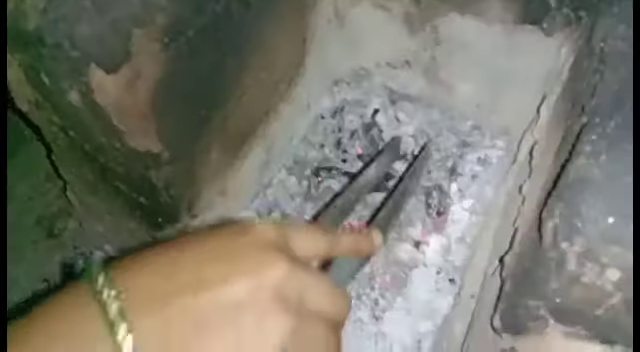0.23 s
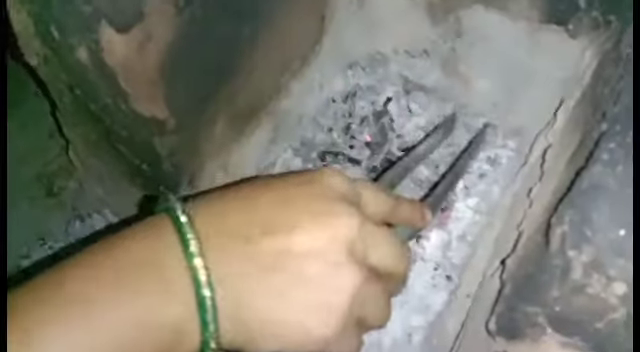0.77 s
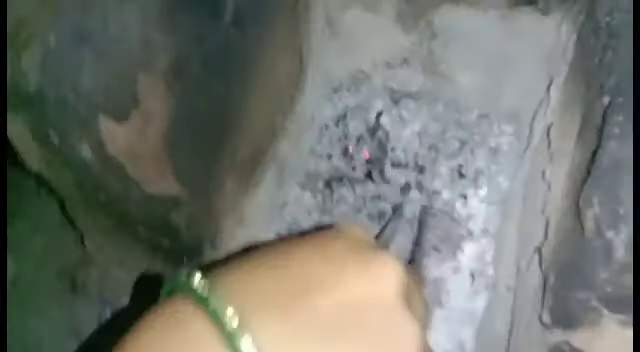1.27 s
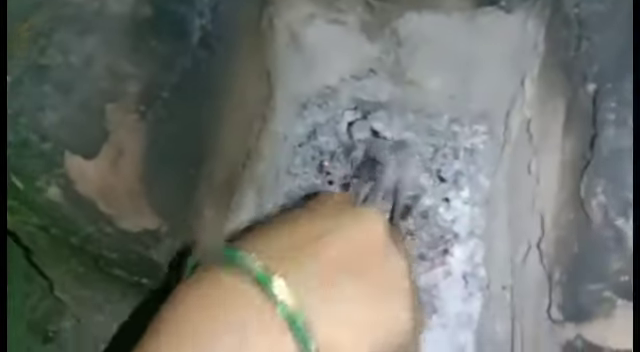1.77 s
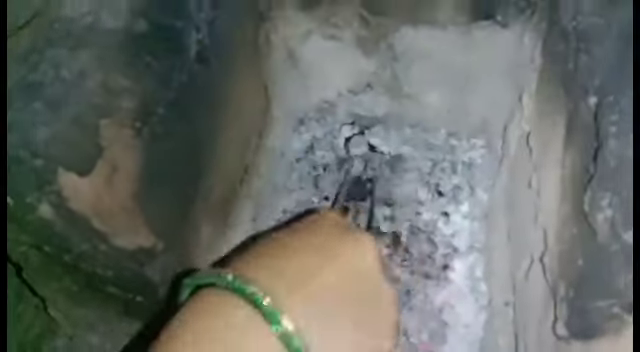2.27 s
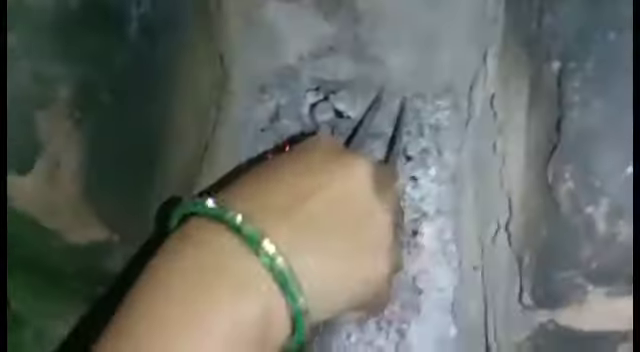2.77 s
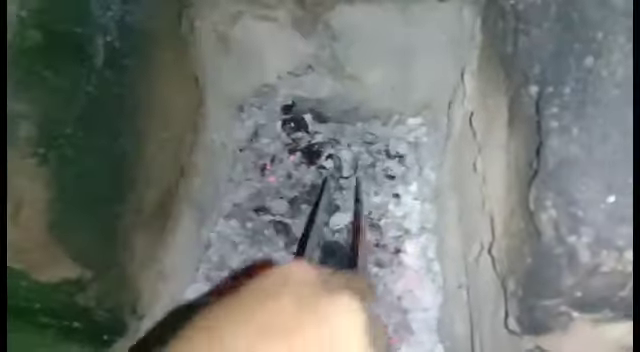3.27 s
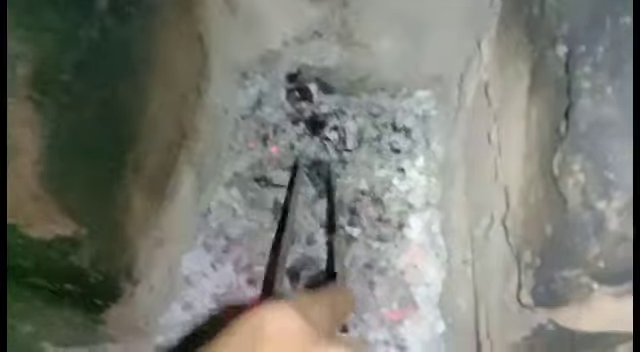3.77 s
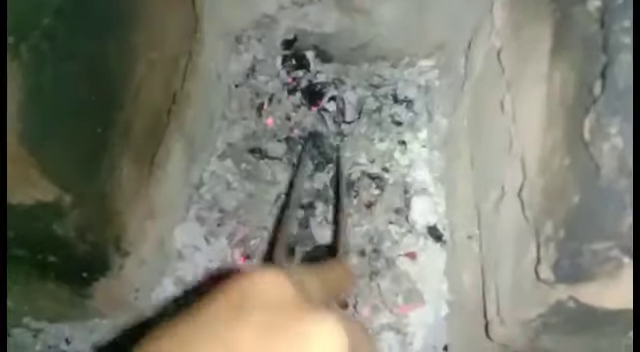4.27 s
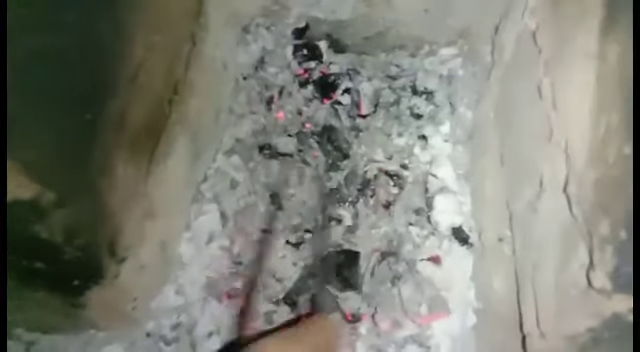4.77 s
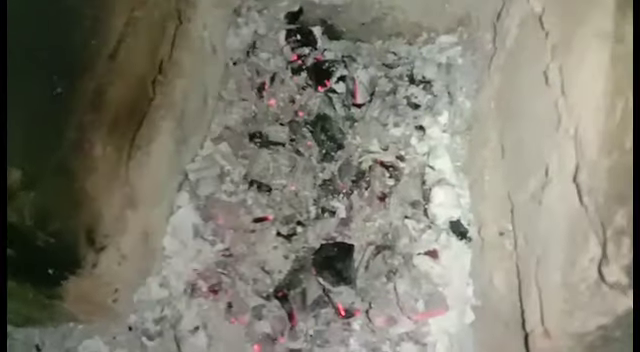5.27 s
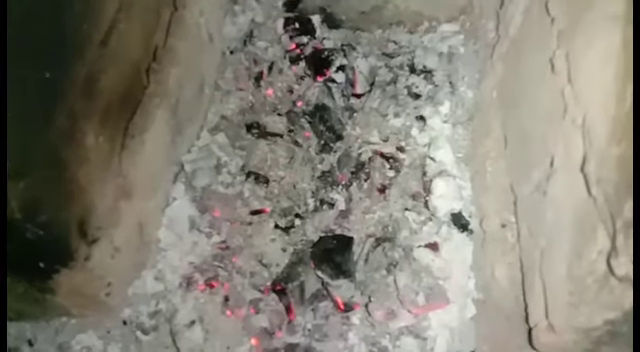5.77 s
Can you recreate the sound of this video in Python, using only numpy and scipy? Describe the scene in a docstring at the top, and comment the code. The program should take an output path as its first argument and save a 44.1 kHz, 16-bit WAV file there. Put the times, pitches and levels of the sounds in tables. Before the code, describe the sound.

Steel tongs work through ash and coals in a clay stove, close up, over a faint low outdoor rumble and thin hiss. Two light ticks come in the first half second. At about 1 second a gritty scrape begins, with brittle coal crunches and small, high clinks that die quickly in the ash. A denser cluster follows from 1.6 to 2 seconds and another around 2.4. The sharpest crunching and scraping falls between 2.8 and 3.8 seconds, with further short strokes near 4.1 and from 4.4 to 4.7. Scattered lighter clicks follow. From about 5.1 to 5.8 seconds a very faint two-tone horn sounds far away. Between 5.5 and 5.8 seconds the tongs are laid down with several dull knocks on the clay, one clearly stronger, and a slight metallic ring. The close walls add only a very short tail.

```python
"""Steel tongs rake ash and embers in a clay stove outdoors. Each stroke is a rush of dense grit; each knock
on a coal is a brittle crunch that rings the steel, choked while the tips are buried. Dull blows ring
the clay and boom in the stove floor, most of them at the end as the tongs are laid down.
The close walls add a short tail. Underneath lie a low rumble, thin hiss and a faint steady tone,
and a far two-tone horn sounds near the end."""
import sys
import numpy as np
from scipy import signal
from scipy.fft import rfft, irfft, next_fast_len
from scipy.io import wavfile
from scipy.ndimage import uniform_filter1d

SR = 44100
rng = np.random.default_rng(int(sys.argv[2]) if len(sys.argv) > 2 else 0)


def store_pcm(level_fs):
    """Save levels as 16-bit WAV."""
    pcm = np.round(np.clip(level_fs, -1, 1) * 32767).astype(np.int16)
    wavfile.write(sys.argv[1], SR, np.atleast_2d(pcm).T)


N = 265923

# modes of the steel tongs: (pitch [Hz], level [dB], undamped t60 [s])
TONG_MODES = [(860, -16, .12), (1270, -8, .35), (1780, -11, .25), (2015, -12, .2), (2465, -15, .5),
              (2870, -19, .3), (3280, -14, .35), (3570, -16, .2), (3725, -16, .35), (4040, -18, .3),
              (4330, -18, .2), (4760, -5, .2), (5000, -10, .25), (5420, -6, .15), (5750, -8, .2),
              (6455, -5, .6), (6580, -1, .15), (6920, -7, .08), (7240, -6, .08), (7520, -12, .06),
              (8710, -24, .06), (9300, -23, .06), (9690, -23, .06), (10200, -19, .06), (10760, -19, .06),
              (11180, -16, .08), (11650, -19, .08), (12600, -23, .05)]
# brittle coal cracking against steel: (frequency [Hz], level [dB])
CRACK_EQ = [(150, -61.5), (250, -6.5), (841, -16.5), (1030, -48), (1270, -6), (2930, -22.5), (3300, -7),
            (4280, -20), (4670, -5.5), (6160, -5.5), (6600, -2.5), (8130, -13), (11300, -7.5), (13400, -16),
            (15700, -50)]
# knocks on coals: (time [s], level [dB], lows [dB], highs [dB], crunch pitch [Hz], ring pitch [Hz],
# ring [dB], blade ring [dB], leg ring [dB]); lows, highs and rings are relative to the level
KNOCK_HITS = [(0.1074, -53, -14, -14, 5990, 5750, -36, -38, -36),
              (0.1368, -44.5, -22, -20, 6150, 5860, -34, -33, -46),
              (0.1591, -25, -35, -35, 6630, 7240, -52, -30, -36),
              (0.3269, -31.5, -17, -43, 3080, 2870, -15, -52, -47),
              (1.0283, -33, -36, -46, 5250, 5250, -34, -40, -35),
              (1.042, -34, -11, -28.5, 5540, 3570, -38, -52, -44),
              (1.0942, -27.5, -10.5, -23.5, 5800, 7300, -11, -41, -23),
              (1.1447, -40, -25, -20, 6880, 6880, -34, -42, -42),
              (1.17, -30, -17, -18, 6900, 6740, -34, -42, -42),
              (1.188, -10, -30.5, -24.5, 6300, 4760, -43, -52, -27),
              (1.2544, -25, -11, -24, 6900, 3280, -52, -51.5, -41),
              (1.34, -36.5, -13, -12, 5700, 5550, -36, -44, -40),
              (1.3632, -35, -23, -23, 5830, 3263, -52, -48.5, -47),
              (1.3935, -35, -37, -19, 6300, 7300, -50, -52, -47.5),
              (1.575, -27, -35, -22.5, 5400, 7160, -47, -36.5, -32),
              (1.6842, -16.5, -16.5, -21, 6610, 6610, -37, -41, -45),
              (1.6933, -12.5, -21.5, -24, 4840, 4700, -25, -31, -42),
              (1.7122, -8.5, -44, -24, 6360, 6490, -44, -38, -35),
              (1.724, -14.5, -30, -34, 6540, 6610, -34, -38, -37),
              (1.739, -21, -18.5, -21, 6430, 2465, -37, -52, -30),
              (1.8071, -20.5, -27, -19.5, 6070, 5420, -21, -36, -18.5),
              (1.8538, -17, -34, -26, 6450, 6740, -34, -36, -40),
              (1.8804, -25, -14, -19, 6430, 6430, -34, -36, -42),
              (1.8962, -21, -34, -36, 6000, 5910, -34, -38, -42),
              (1.909, -14, -39, -28.5, 6260, 5750, -52, -53, -46),
              (1.9597, -23, -33, -25.5, 5000, 3760, -35, -53, -44),
              (2.0468, -26, -34, -25.5, 6560, 2015, -23, -26, -29),
              (2.0863, -46, -17, -25, 6520, 1790, -50.5, -51, -42),
              (2.3174, -33.5, -3.5, -8, 5400, 5440, -36, -40.5, -37),
              (2.3332, -24.5, -15, -26, 6850, 6890, -34, -42, -42),
              (2.3544, -20, -20.5, -21.5, 4720, 4720, -34, -38, -42),
              (2.3736, -17.5, -36, -29, 4720, 3280, -40, -23, -31),
              (2.4158, -25, -17, -32, 7140, 7140, -34, -37, -42),
              (2.4396, -36.5, -8, -12, 5300, 2465, -26, -51, -14),
              (2.473, -19, -23, -23.5, 6740, 5420, -30, -34, -19),
              (2.6455, -20, -37, -19, 6950, 5420, -43, -31.5, -48.5),
              (2.718, -50.5, -2, -27, 6640, 6600, -31, -28, -38),
              (2.7447, -20, -21.5, -23, 7100, 5420, -45, -34, -46),
              (2.8497, -31, -6, -9, 3660, 3590, -36, -28, -35),
              (2.8583, -2.5, -30, -20.5, 5540, 5380, -41, -28, -48),
              (2.8682, -17, -27, -28, 6740, 6780, -30, -30, -32),
              (2.8782, -10, -41, -21, 6740, 7240, -50, -30, -49),
              (2.9758, -13, -32, -28.5, 5350, 4760, -28, -52, -44),
              (3.0241, -25.5, -11, -22, 3640, 3600, -34, -53, -42),
              (3.0413, -19, -14, -19, 6800, 6640, -36, -43, -42),
              (3.0526, -7.5, -22, -22, 6700, 6760, -34, -38, -24),
              (3.0597, -12, -20, -45, 6500, 6440, -29, -38, -45),
              (3.0845, -16, -24, -13, 6500, 6590, -34, -36, -37),
              (3.0914, -4, -37.5, -24, 6640, 6900, -38, -40, -45),
              (3.0994, -17.5, -39, -33.5, 6800, 4760, -51, -9.5, -47),
              (3.159, -17, -21, -22.5, 7200, 3220, -55, -54, -44),
              (3.2024, -40, -24, -17, 6590, 2015, -31, -7.5, -44),
              (3.2433, -14.5, -35, -35, 6560, 4760, -46, -43, -33.5),
              (3.2938, -15, -27.5, -25, 6820, 2550, -31.5, -40, -33),
              (3.394, -50.5, -13, -15, 6420, 6380, -27, -36, -41),
              (3.402, -48, -20, -6.5, 3820, 5750, -42, -52, -43),
              (3.4347, -56, -7, -25.5, 3660, 2465, -19, -56.5, -45),
              (3.4888, -59.5, -35, -3, 5780, 7240, -22.5, -50.5, -19),
              (3.5429, -18, -22, -31, 5300, 5160, -36, -37, -39),
              (3.5607, -16, -28.5, -23.5, 7400, 7070, -36, -39.5, -44),
              (3.5777, -11.5, -32, -32, 6600, 5420, -52, -52, -31),
              (3.6211, -20.5, -20.5, -23, 6050, 3725, -21.5, -30, -44),
              (3.6626, -8.5, -34, -26, 7000, 5750, -41, -35, -34),
              (3.7004, -13, -24.5, -22, 6640, 1780, -32, -30, -34),
              (3.7448, -27, -21, -35, 4550, 4700, -52, -33, -44),
              (3.7827, -29, -25, -27, 3400, 3590, -31, -44, -28.5),
              (3.8115, -34, -24, -24, 6800, 6980, -31, -30.5, -22),
              (3.8251, -16.5, -33.5, -26.5, 6960, 4730, -50, -35, -46),
              (3.8684, -58, -24, -30, 6660, 1740, -17, -31, -16.5),
              (3.9269, -54, -14.5, -22, 6800, 4730, -53, -31.5, -33),
              (3.9997, -24.5, -23, -40, 4480, 2465, -37, -48, -30),
              (4.059, -37.5, -24, -19.5, 5700, 7240, -11, -46, -14),
              (4.0924, -22.5, -10.5, -28, 6550, 6460, -36, -38, -36),
              (4.1012, -15.5, -25, -37, 6860, 4100, -46, -51, -17.5),
              (4.165, -16.5, -30, -32, 6230, 4670, -53, -53, -44.5),
              (4.4249, -36, -7, -18, 5430, 5430, -30, -38, -42),
              (4.4434, -11, -27, -25, 6560, 7240, -41, -18, -46),
              (4.4881, -13, -25.5, -30.5, 7070, 3725, -29, -54, -39),
              (4.519, -37, -25, -24, 5400, 5400, -34, -42.5, -42),
              (4.5368, -13, -30, -27.5, 5670, 2015, -26, -51, -25),
              (4.5789, -11.5, -31.5, -28, 5630, 3280, -56, -53, -24),
              (4.6244, -30.5, -13, -17.5, 5530, 5400, -34, -39, -42),
              (4.6498, -19, -29, -30, 6460, 4760, -52, -50, -32),
              (4.7145, -30, -28.5, -30.5, 6960, 4530, -59, -52, -41),
              (4.8842, -30.5, -27, -35.5, 3730, 3280, -24.5, -52, -22),
              (4.9195, -30, -13.5, -34, 7200, 5420, -53, -53.5, -45),
              (5.0492, -37, -31, -37.5, 5080, 5120, -14, -38, -33),
              (5.0905, -24.5, -34, -33, 4770, 5000, -23, -52, -17),
              (5.1333, -34, -22.5, -30.5, 5120, 5000, -55, -40.5, -44),
              (5.318, -16.5, -38, -18, 5970, 2465, -30, -40, -42),
              (5.3627, -37, -21, -26, 5750, 4760, -20, -54, -28),
              (5.4148, -33.5, -41.5, -30.5, 4900, 7240, -45, -52, -31),
              (5.4862, -40, -10.5, -27, 5610, 4760, -26, -55, -27),
              (5.5342, -44, -8, -38, 3900, 3900, -36, -40, -42),
              (5.551, -29.5, -25, -51, 4820, 4760, -13.5, -51, -44),
              (5.587, -39.5, -21, -25, 5600, 3725, -15, -38.5, -44),
              (5.6219, -48, -2, -21, 3260, 4760, -36.5, -42, -36),
              (5.6543, -15.5, -19, -26, 5700, 4760, -41, -38, -44),
              (5.6857, -29.5, -18, -20.5, 7350, 7240, -52, -52.5, -44),
              (5.756, -34.5, -19, -38, 4670, 3650, -19, -52.5, -5.5),
              (5.8155, -39, -20, -42, 3670, 2340, -5, -50.5, -44)]
# strokes through ash: (start [s], dig [s], drag [s], lift [s], level once dug in [dB],
# level before lifting [dB], lows against mids [dB], highs against mids [dB])
ASH_STROKES = [(.09, 0.068, 0.044, 0.053, -61.5, -64, -6.5, -23),
               (0.323, 0.014, 0.031, 0.059, -64, -63, 0, -17),
               (1.04, 0.16, 0.18, 0.071, -37.5, -65, -1.5, -12.5),
               (1.674, .025, 0.11, 0.037, -41, -43.5, -4.5, -9),
               (1.779, 0.027, .16, .08, -38, -46.5, 4, -10),
               (2.044, 0.013, 0.051, 0.087, -57.5, -67.5, 6.5, -26),
               (2.189, 0.029, 0.055, 0.029, -70, -75.5, 4.5, -14.5),
               (2.71, .01, .04, 0.034, -60.5, -55.5, 7.5, -22),
               (5.315, 0.004, 0.076, .04, -46.5, -58, -5.5, -24),
               (2.308, 0.039, .19, 0.063, -39.5, -48, 2, -8),
               (2.85, 0.024, 0.16, 0.031, -34, -46.5, -1.5, -14),
               (3.019, 0.035, 0.1, .11, -52, -37, 1, -15),
               (3.535, .04, 0.084, 0.017, -38.5, -44.5, -3.5, -14),
               (3.63, 0.064, 0.028, .14, -40, -37.5, -5, -18.5),
               (3.841, .02, 0.085, 0.06, -71, -70, -4, -19), (4.05, 0.06, 0.0153, .09, -47, -45.5, 6, -15),
               (4.17, .01, 0.083, 0.024, -64.5, -68, -3.5, -14.5),
               (4.42, 0.054, 0.16, 0.071, -45.5, -41.5, -1, -14),
               (4.828, 0.037, 0.019, 0.034, -70.5, -52, -2.5, -26),
               (4.889, 0.031, 0.014, .03, -48.5, -51.5, 5, -17.5),
               (5.535, 0.022, 0.074, 0.024, -61.5, -74, 11.5, -14),
               (5.635, 0.02, 0.086, 0.039, -37, -65, 11.5, -16),
               (5.8, 0.035, 0.061, .1, -58.5, -83, 10.5, -26)]
# dull blows on the clay: (time [s], level [dB], favoured pitch [Hz], t60 factor, floor boom trim [dB])
CLAY_HITS = [(0.328, -23.5, 500, 0.73, -42), (1.043, -24, 740, 0.44, -28), (1.092, -31, 900, 1.3, -21),
             (1.684, -22, 1370, 1.9, -40), (4.425, -27, 1304, 1.4, -23), (5.534, -26, 1280, 1.3, -4),
             (5.619, -30, 1202, 1.3, -6), (5.647, -0.5, 1280, 0.57, -2.5), (5.663, -42, 1090, 0.87, -11),
             (5.701, -17, 1140, 0.74, 6), (5.754, -25, 1170, 1.85, 0), (5.816, -26, 1270, 1.52, -3)]
# modes of the clay wall: (pitch [Hz], level [dB], base t60 [s])
WALL_MODES = [(365, -13, 0.33), (493, 1.5, 0.039), (801, 2.5, 0.046), (1140, -7, 0.33), (1269, 9, 0.027),
              (1810, -1, 0.039)]
# modes of the stove floor: (pitch [Hz], level [dB], t60 [s])
FLOOR_MODES = [(150, -9, .1), (195, -4, .09), (238, 0, .08), (300, -11, .06)]
# colour of the outdoor air: (frequency [Hz], level [dB])
AIR_EQ = [(12, -45.5), (20, -34.5), (61, 1.5), (113, 2), (260, -13.5), (494, -20.5), (601, -21.5),
          (710, -27.5), (1050, -33), (1240, -23.5), (1830, -41), (2050, -31), (3680, -44), (5000, -42.5),
          (15700, -56.5)]
# fader moves on the outdoor air: (time [s], rumble [dB], hiss [dB])
AIR_LEVELS = [(.09, -68.5, -72), (.3, -52, -66.5), (1, -51.5, -65.5), (2, -50.5, -64.5), (3, -46.5, -63.5),
              (4, -48, -68), (5.002, -49.5, -64), (6.03, -52.5, -65.5)]
# the far horn's two tones: (start [s], length [s], pitch [Hz], level [dB])
HORN_TONES = [(5.12, 0.63, 520, -62), (5.179, 0.23, 609, -69)]
# overall tone, with thin bass, a fizzy peak near 15 kHz and the treble cut above 15.5 kHz:
# (frequency [Hz], gain [dB])
MASTER_EQ = [(25, -29), (58, -7.5), (13600, -1.5), (14600, 12), (15350, 7), (15650, -16.5)]

BURIED_DB_PER_S, LIFTED_DB_PER_S = 256, 99.5  # damping of the ring by ash, or by the hand alone
DEEP_DB = -50  # strokes louder than this bury the tips
BLADE_HZ, LEG_HZ = 6455, 1270
RISE_S, CRUNCH_T60_S, FOCUS_DB = .0024, .023, -14.5  # focus: cut a fifth away from the crunch pitch
SIFT_DB, SIFT_T60_S = -28.5, .12  # ash trickling back after a knock
TOUCH_DB, LEAVE_DB = -63.5, -78  # grit as the tips meet the ash and as they leave it


def gain_of(db):
    """Decibels to gain."""
    return 10 ** (np.asarray(db) / 20)


def evened(x):
    """Scales to rms 1."""
    return x / np.sqrt(np.mean(x ** 2) + 1e-20)


def add(mix, start, sound):
    """Mixes a sound in at its start time in seconds."""
    part = mix[round(start * SR):][:len(sound)]
    part += sound[:len(part)]


def colour(x, curve):
    """EQ through (frequency [Hz], gain [dB]) points on a log-frequency axis."""
    size = next_fast_len(len(x))
    hz, db = np.transpose(curve)
    bin_db = np.interp(np.log(np.fft.rfftfreq(size, 1 / SR) + 1), np.log(hz + 1), db)
    return irfft(rfft(x, size) * gain_of(bin_db), size)[:len(x)]


def bands(x):
    """Splits into lows, mids and highs, each of rms 1."""
    lows = colour(x, [(1800, 0), (2600, -6), (4200, -50)])
    highs = colour(x, [(7000, -50), (7900, -6), (8600, 0)])
    return evened(lows), evened(x - lows - highs), evened(highs)


def wobble(size, depth_db, span):
    """A random gain that drifts over about span samples."""
    drift = uniform_filter1d(uniform_filter1d(rng.standard_normal(size), span), span)
    return gain_of(depth_db * evened(drift))


def ring(modes, seconds, trim_db, loss_db_per_s=0):
    """Impulse response of modes, with the added loss of what touches the body."""
    hz, db, t60 = np.transpose(modes)[:, :, None]
    t = np.arange(round(seconds * SR)) / SR
    decay = gain_of(db + trim_db - (60 / t60 + loss_db_per_s) * t)
    return (decay * np.sin(2 * np.pi * hz * t)).sum(0)


def favour(modes, hz, db_per_octave):
    """Trim in dB for each mode: the contact point favours those around one pitch."""
    return -db_per_octave * abs(np.log2(np.array(modes)[:, :1] / hz)).clip(0, 1.2)


def outdoor_air():
    """The bed: lumpy low rumble, thin hiss and a faint steady tone."""
    times, rumble_db, hiss_db = np.transpose(AIR_LEVELS)
    t = np.arange(N) / SR
    noise = colour(rng.standard_normal(N), AIR_EQ)
    lows = colour(noise, [(260, 0), (340, -60)])
    rumble = evened(lows * wobble(N, 3, span=1500)) * gain_of(np.interp(t, times, rumble_db))
    hiss = evened(noise - lows) * gain_of(np.interp(t, times, hiss_db))
    whine = gain_of(-81.5) * np.sin(2 * np.pi * 1999 * t)
    fade_in = np.clip((t - times[0]) / .0063, 0, 1)
    return (rumble + hiss + whine) * fade_in


def ash_stroke(dig, drag, lift, dug_db, dragged_db, low_db, high_db):
    """Dense grit: grains crack against the tips and shake the ash-damped steel."""
    times = np.cumsum([0, dig, drag, lift])
    t = np.arange(0, times[-1], 1 / SR)
    level_db = np.interp(t, times, [min(TOUCH_DB, dug_db), dug_db, dragged_db, LEAVE_DB])
    sizes = gain_of(3 * np.minimum(rng.exponential(1, len(t)), 3.5))
    grains = sizes * rng.standard_normal(len(t)) * (rng.random(len(t)) < .45)
    grains *= wobble(len(t), .47, span=130)  # the tips catch and slip
    scatter_db = 3 * rng.standard_normal((len(TONG_MODES), 1))
    steel = signal.fftconvolve(grains, ring(TONG_MODES, .1, scatter_db, loss_db_per_s=1400))[:len(t)]
    scrape = evened(colour(grains, CRACK_EQ)) + gain_of(-3) * evened(steel)
    lows, mids, highs = bands(coal_lumps(scrape, depth_db=4))
    grit = gain_of(level_db) * (mids + gain_of(low_db) * lows + gain_of(high_db) * highs)
    return grit * signal.windows.tukey(len(t), 200 / len(t))


def coal_lumps(x, depth_db):
    """Every lump of coal has its own colour: random patches over time and pitch."""
    spectra = signal.stft(x, nperseg=256)[2]
    patches = uniform_filter1d(rng.standard_normal(spectra.shape), size=4, axis=0)
    patches = uniform_filter1d(patches, size=7, axis=1)
    return signal.istft(spectra * gain_of(depth_db * evened(patches)), nperseg=256)[1][:len(x)]


def stove_reverb(x, t60=.065):
    """Clay walls close by throw back a short dense tail."""
    t = np.arange(round(.2 * SR)) / SR
    echoes = rng.choice([-1., 1.], len(t)) * (rng.random(len(t)) < .06)
    tail = echoes * gain_of(-60 * t / t60) * (t > .0015)
    return signal.fftconvolve(x, tail / np.linalg.norm(tail))[:N]


def coal_crunch(t, low_db, high_db, crunch_hz, scatter_db, buried):
    """A burst of splinters, heard directly and through the damped steel; then ash trickles back."""
    noise = rng.standard_normal(len(t)) * wobble(len(t), 1.2, span=25)
    attack = np.minimum(t / RISE_S, 1) ** 2
    envelope = gain_of(-60 * t / CRUNCH_T60_S) * attack
    trim_db = scatter_db + favour(TONG_MODES, crunch_hz, 30)
    choked = ring(TONG_MODES, .08, trim_db, loss_db_per_s=920)
    steel = signal.fftconvolve(noise * envelope ** 2, choked)[:len(t)]
    splinters = colour(noise, [(500, -21), (1100, -5)])  # small splinters carry no bass
    focus = [(crunch_hz / 1.5, FOCUS_DB), (crunch_hz, 0), (crunch_hz * 1.5, FOCUS_DB)]
    crack = colour(colour(splinters, CRACK_EQ), focus)
    sift = gain_of(SIFT_DB - 60 * t / SIFT_T60_S) * attack * evened(crack)
    sift /= np.sqrt(np.mean(envelope ** 2))
    blend = evened(crack * envelope) + gain_of(-2 if buried else 3) * evened(steel) + sift
    lows, mids, highs = bands(blend)
    lows, highs = (band / np.sqrt(np.mean(band[:500] ** 2)) for band in (lows, highs))  # onset rms 1
    fade_out = np.clip(2 - t / .15, 0, 1)
    return (mids / abs(mids).max() + gain_of(high_db) * highs + gain_of(low_db) * lows) * fade_out


def tong_knock(db, low_db, high_db, crunch_hz, ring_hz, ring_db, blade_db, leg_db, scatter_db, buried):
    """The tongs hit a coal: it crunches and the steel rings on, shorter with the tips in ash."""
    t = np.arange(round(.4 * SR)) / SR
    crunch = coal_crunch(t, low_db, high_db, crunch_hz, scatter_db, buried)
    mode_db = np.max([ring_db + favour(TONG_MODES, ring_hz, 70),
                      ring_db - 3 + favour(TONG_MODES, crunch_hz, 70),
                      blade_db + favour(TONG_MODES, BLADE_HZ, 200),
                      leg_db + favour(TONG_MODES, LEG_HZ, 22)], axis=0)
    flat_modes = np.array(TONG_MODES) * [1, 0, 1]
    damping = BURIED_DB_PER_S if buried else LIFTED_DB_PER_S
    ringing = ring(flat_modes, .4, mode_db + .5 * scatter_db, damping) * np.minimum(t / .0034, 1)
    ringing *= wobble(len(t), 4, span=350)  # the legs swing and the grip shifts
    return gain_of(db) * (crunch + ringing)


def clay_thud(db, hz, t60_factor, boom_db, scatter_db):
    """A short push rings the thick clay wall and the floor under it."""
    modes = np.array(WALL_MODES) * [1, 1, t60_factor]
    wall = ring(modes, .25, scatter_db + favour(WALL_MODES, hz, 15))
    floor = ring(FLOOR_MODES, .25, boom_db)
    thud = signal.fftconvolve(signal.windows.hann(12), wall + floor)
    return gain_of(db) * thud / abs(thud).max()


def far_horn(length, hz, db):
    """One distant tone; the air takes its overtones and makes it waver."""
    t = np.arange(0, length, 1 / SR)
    tone = np.sqrt(2) * np.sin(2 * np.pi * hz * t) * wobble(len(t), 4, span=700)
    return gain_of(db) * tone * signal.windows.tukey(len(t), .3)


def scene():
    """Tongs, ash and clay up close in the stove, over the outdoor bed."""
    near, far = np.zeros(N), outdoor_air()
    knock_scatter_db = 3 * rng.standard_normal((len(KNOCK_HITS), len(TONG_MODES), 1))
    for (time, *hit), scatter_db in zip(KNOCK_HITS, knock_scatter_db):
        buried = any(0 <= time - start < dig + drag and dug_db > DEEP_DB
                     for start, dig, drag, _, dug_db, *_ in ASH_STROKES)
        add(near, time, tong_knock(*hit, scatter_db, buried))
    thud_scatter_db = 2 * rng.standard_normal((len(CLAY_HITS), len(WALL_MODES), 1))
    for (time, *hit), scatter_db in zip(CLAY_HITS, thud_scatter_db):
        add(near, time, clay_thud(*hit, scatter_db))
    for start, *stroke in ASH_STROKES:
        add(near, start, ash_stroke(*stroke))
    for start, *tone in HORN_TONES:
        add(far, start, far_horn(*tone))
    return (near + gain_of(-15) * stove_reverb(near) + far)[None]


def record(dry):
    """Overall tone: thin bass and a fizzy top, then a steep low-pass."""
    coloured = colour(dry[0], MASTER_EQ)[None]
    low_pass = signal.firwin(511, cutoff=16700, window=("kaiser", 9), fs=SR)
    return signal.oaconvolve(coloured, low_pass[None], "same")


dry = scene()
out = record(dry)
store_pcm(out)
```